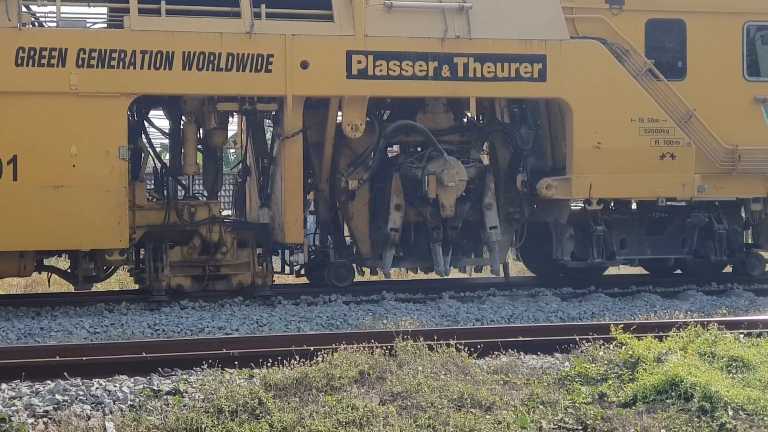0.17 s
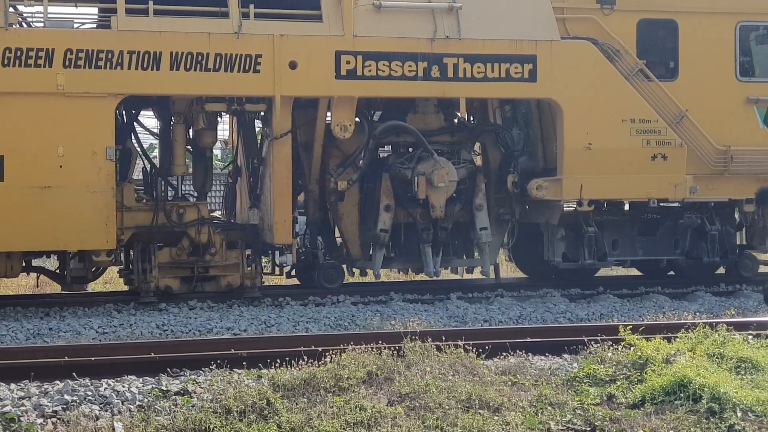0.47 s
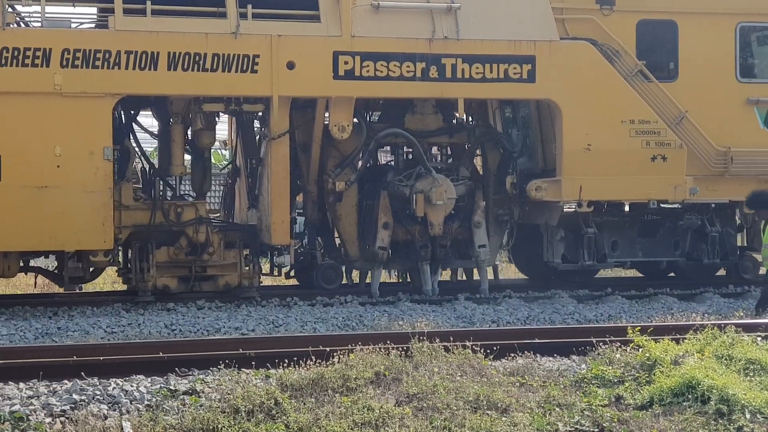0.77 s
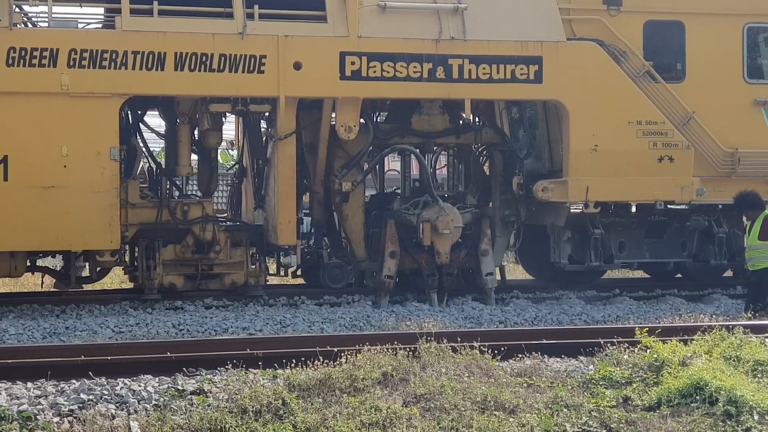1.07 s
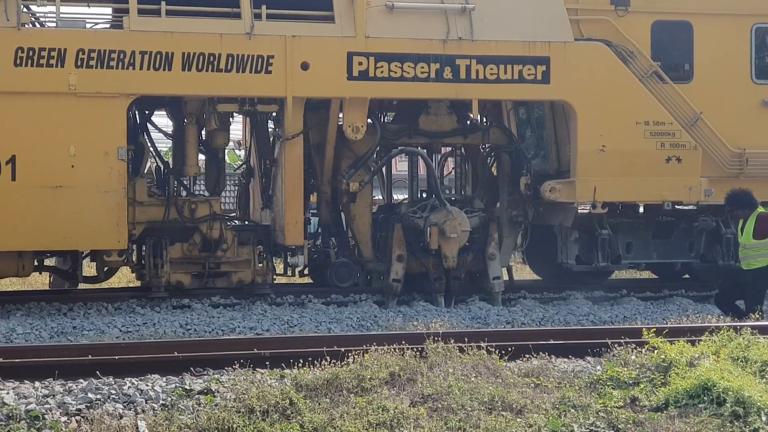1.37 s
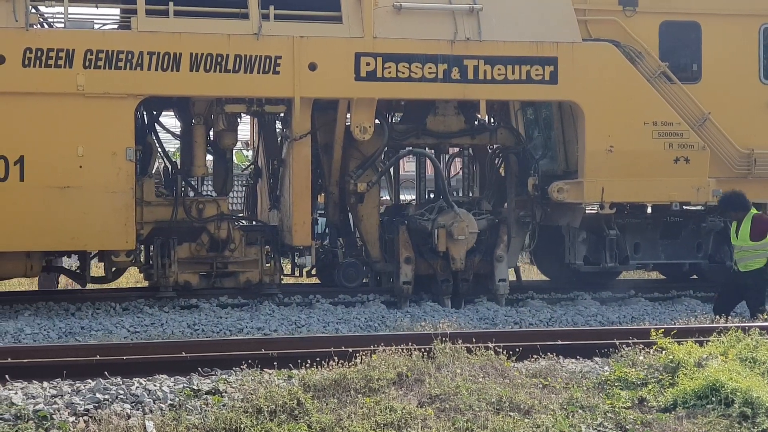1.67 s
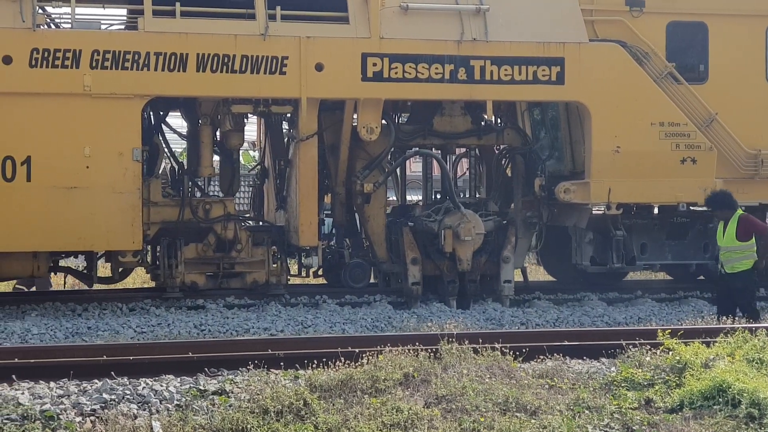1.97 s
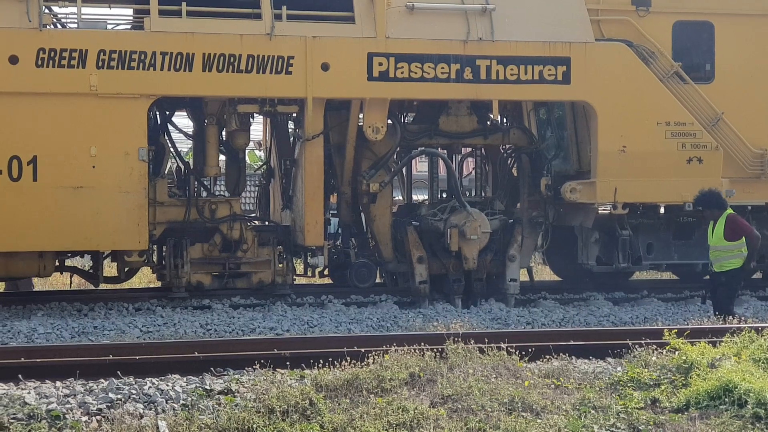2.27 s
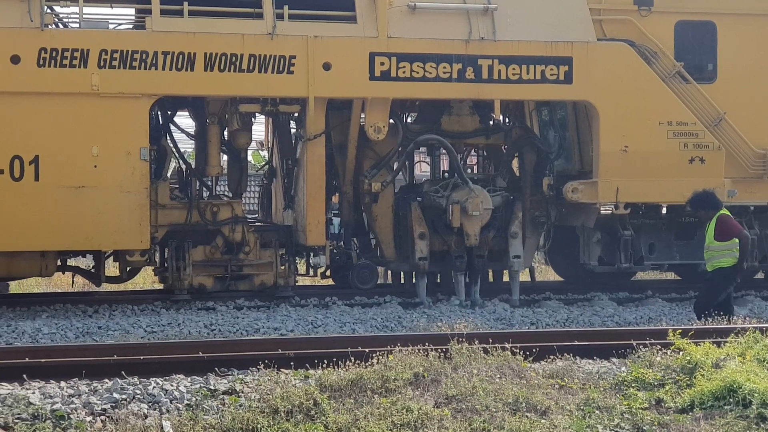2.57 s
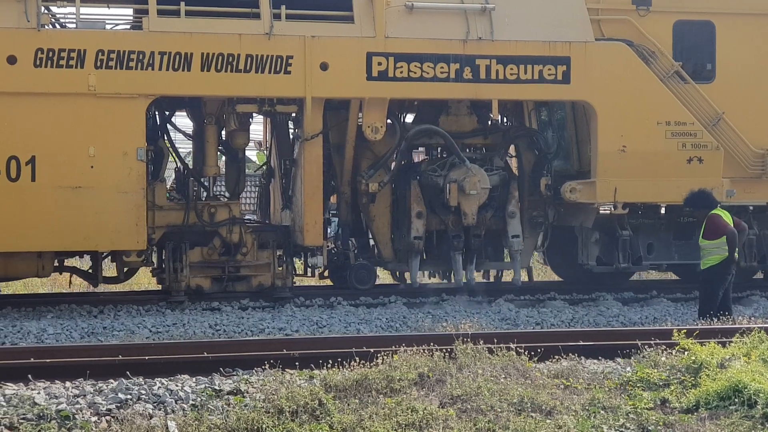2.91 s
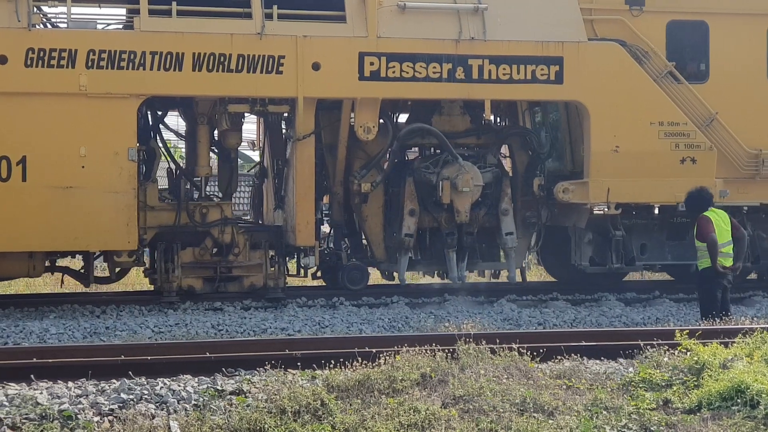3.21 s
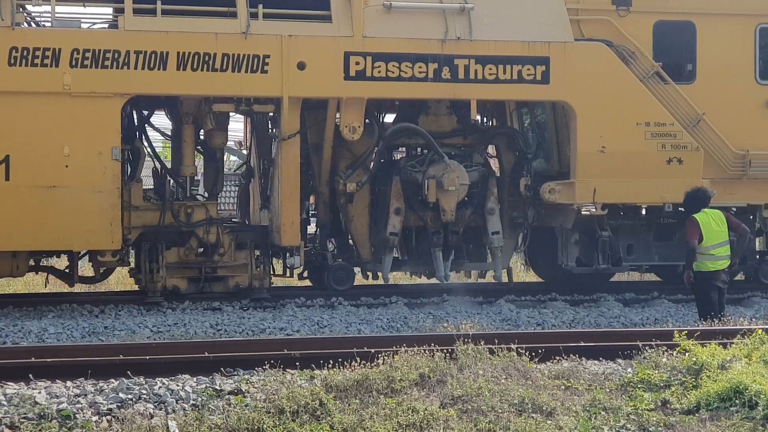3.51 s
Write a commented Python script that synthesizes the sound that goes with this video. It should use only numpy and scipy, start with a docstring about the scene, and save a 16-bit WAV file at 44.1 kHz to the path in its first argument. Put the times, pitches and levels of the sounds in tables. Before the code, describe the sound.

Track tamper crunches into ballast with metal squeaks and knocks over a steady diesel roar.

```python
"""Beside a railway line, a stereo microphone pair within earshot of a track tamping machine at work.
Its big diesel drones under a steady roar of fans, pumps and ringing panels. The tamping unit drops
with squeaks of sliding steel and clacks that ring its frame. The vibrating tines crunch into the
ballast and grind among the stones, and the crunch falls back as the unit lifts."""
import sys
import numpy as np
from scipy import signal
from scipy.fft import rfft, irfft
from scipy.io import wavfile
from scipy.ndimage import uniform_filter1d

SR = 44100
rng = np.random.default_rng(int(sys.argv[2]) if len(sys.argv) > 2 else 0)


def put_to_file(sound):
    """Save the sound as 16-bit audio at rate SR, in the file named by the first command-line argument."""
    columns = np.atleast_2d(sound).T  # one column per channel
    safe = np.clip(columns, -1, 1)
    whole_steps = np.round(safe * 32767)
    wavfile.write(sys.argv[1], SR, whole_steps.astype(np.int16))


N = 160965


def amp(db):
    return 10 ** (np.asarray(db) / 20)


def unit_rms(x):
    return x / np.sqrt(np.mean(x ** 2) + 1e-20)


def at_hz(points, hz):
    """Reads (frequency, value) points along a log frequency axis."""
    f, value = np.transpose(points)
    return np.interp(np.log(hz + 1), np.log(f + 1), value)


def curve(table, column):
    """One column of a timed table, joined by straight lines, at every sample."""
    table = np.asarray(table, float)
    return np.interp(np.arange(N) / SR, table[:, 0], table[:, column])


def colour(x, gain):
    """Filters by gain(hz) over the whole length."""
    return irfft(rfft(x) * gain(np.fft.rfftfreq(N, 1 / SR)), N)


def treble(hz, corner_hz):
    """Weight rising from 0 in the bass through a half at the corner towards 1."""
    return 1 / (1 + (corner_hz / (hz + 1)) ** 2)


def drift(rate_hz):
    """Random wander of rms 1, mostly slower than rate_hz."""
    return unit_rms(colour(rng.standard_normal(N), lambda hz: (hz > 0) / (1 + (hz / rate_hz) ** 4)))


def impacts(per_s, spread_db, decay_s):
    """Two noises chopped by one random train of small impacts whose power dies away."""
    energy = amp(2 * spread_db * np.minimum(rng.exponential(1, N), 5))
    strikes = rng.random(N) < per_s / SR
    power = signal.lfilter([1], [1, -np.exp(-1 / (decay_s * SR))], energy * strikes)
    return unit_rms(np.sqrt(power) * rng.standard_normal((2, N)))


def machine_roar():
    """The bed: fans and pumps roar through ringing panels, with a loose rattle in the treble."""
    # fan and pump noise (frequency [Hz], density [dB per Hz])
    spectrum = [(20, -75), (45, -56.5), (70, -53.5), (110, -57), (135, -58), (200, -62.5), (260, -61),
                (350, -59), (450, -60.5), (600, -64), (740, -59), (820, -59), (920, -59), (1050, -66.5),
                (1300, -64.5), (1700, -69), (2150, -70), (2700, -76.5), (3600, -77.5), (4200, -76.5),
                (6000, -83.5), (9000, -85), (16000, -89.5)]
    # resonances of panels and housings (frequency [Hz], width [Hz], boost [dB])
    panels = [(245, 10, 2), (347, 11.7, 6), (391, 24, 2.5), (750, 19, 2.5), (813, 36, 3), (832, 22, 4),
              (989, 50, 3.5), (1460, 69, 2.5), (2230, 80, 3.5), (4170, 77, 2)]
    # slight rise and fall of the roar (time [s], level [dB])
    levels = [(0, 0), (.3, 1), (.6, 1), (.9, 1.4), (1.3, -0.7), (1.8, 0.3), (2.3, 0.3), (2.7, -1),
              (3.1, -0.35), (3.65, -0.1)]
    patch_db, flutter_db = 1, 0.94
    rattle_share = lambda hz: 0.33 * treble(hz, corner_hz=1900)
    rush = colour(rng.standard_normal((2, N)), lambda hz: np.sqrt(1 - rattle_share(hz)))
    rattle = colour(impacts(per_s=300, spread_db=3, decay_s=0.006), lambda hz: np.sqrt(rattle_share(hz)))
    # the level flickers in small patches of frequency and time
    cells = signal.stft(rush + rattle, nperseg=2048, noverlap=1536)[2]
    patches = uniform_filter1d(rng.standard_normal(cells.shape[1:]), size=3, axis=0)
    patches = unit_rms(uniform_filter1d(patches, size=8, axis=1))
    noise = signal.istft(cells * amp(patch_db * patches), nperseg=2048, noverlap=1536)[1][:, :N]
    noise = noise * amp(flutter_db * drift(rate_hz=10.3) + curve(levels, 1))
    panel_db = lambda hz: sum(db / (1 + (2 * (hz - f) / width) ** 2) for f, width, db in panels)
    return colour(noise, lambda hz: amp(at_hz(spectrum, hz) + panel_db(hz)) * np.sqrt(SR / 2))


def diesel_drone():
    """Exhaust tone at the firing rate with a few weak orders, louder on the left microphone."""
    # running of the engine (time [s], firing rate [Hz], level of the firing tone [dB])
    running = [(0.08, 78.4, -15), (0.25, 77.9, -15.5), (0.4, 78.9, -14.5), (0.5, 78.7, -15.3),
               (0.6, 79.83, -14.5), (0.68, 78.6, -16), (0.76, 81.1, -17.1), (0.84, 80.9, -16),
               (0.92, 80.24, -17), (1.0, 79.63, -17), (1.1, 79.4, -15.5), (1.2, 78.77, -15),
               (1.35, 78.4, -15.5), (1.5, 78.65, -15.5), (1.7, 78, -15), (1.9, 77.8, -14.5),
               (2.15, 78.2, -15), (2.33, 78.23, -14), (2.45, 78.06, -15.5), (2.7, 77.94, -15),
               (3.0, 78, -15.5), (3.2, 77.7, -15.5), (3.4, 78.4, -15.5), (3.57, 77.91, -15.5)]
    # engine orders (multiple of the firing rate, level against the firing tone [dB], phase [rad])
    orders = [(1, 0, 0.5), (2, -21.5, 3), (4 / 3, -25.5, 0.5), (3 / 2, -31, .3)]
    start_rad, right_lag_rad, left_db = 0.14, .09, 3
    phase = start_rad + 2 * np.pi * np.cumsum(curve(running, 1)) / SR - np.array([[0], [right_lag_rad]])
    tone = sum(amp(db) * np.cos(order * phase + rad) for order, db, rad in orders)
    return np.sqrt(2) * amp(curve(running, 2)) * tone * amp([[left_db / 2], [-left_db / 2]])


def steel_squeaks():
    """Sliding steel whistles: each note swells, glides and rings out, a rough scrape just above it."""
    # squeaks and groans (start [s], hold [s], pitch [Hz], glide [Hz per s], level [dB], t60 [s])
    squeaks = [(.58, .03, 3075, -500, -40, .12), (.625, .035, 3068, -300, -42, .1),
               (.694, .04, 3085, 0, -41, .12), (.745, .025, 4140, 3300, -20, .07),
               (.755, .05, 758, 0, -35, .15), (.774, .014, 4195, 0, -29, .09),
               (.79, .065, 4168, 0, -39.5, .4), (.83, .022, 11470, -3000, -41.5, .13)]
    rise_s, waver_db, pitch_jitter, octave_db = .015, 1.2, .0012, -29
    scrape_db, scrape_above_hz = -16, 140
    right_db, right_lag_s = .6, 5.7e-5
    t, out = np.arange(N) / SR, np.zeros((2, N))
    waver, jitter = drift(rate_hz=60), drift(rate_hz=120)
    roughness = drift(rate_hz=90) + 1j * drift(rate_hz=90)
    scrape = amp(scrape_db) * roughness * np.exp(2j * np.pi * scrape_above_hz * t)
    for start, hold, hz, glide, db, t60 in squeaks:
        age = np.maximum(t - start, 0)
        pitch = hz * (1 + pitch_jitter * jitter) + glide * np.minimum(age, hold)
        phase = 2 * np.pi * (np.cumsum(pitch) / SR - np.array([[0], [hz * right_lag_s]]))
        growing_scrape = scrape * np.minimum(age / hold, 1) ** 2
        tone = ((1 + growing_scrape) * np.exp(1j * phase)).real + amp(octave_db) * np.sin(2 * phase)
        envelope = np.minimum(age / rise_s, 1) ** 2 * amp(db - 60 * np.maximum(age - hold, 0) / t60)
        out += envelope * tone
    return np.sqrt(2) * out * amp(waver_db * waver) * amp([[-right_db / 2], [right_db / 2]])


def frame_clacks():
    """The tamping unit knocks: each clack is a dying burst of noise and a short ring of the frame."""
    # knocks (time [s], level [dB], tilt [dB per octave], top [Hz], t60 of the burst [s],
    # ring level [dB], strongest ring near [Hz])
    knocks = [(.1805, -18.5, -3, 16000, .08, -16, 2200), (.4484, -20.5, -3.5, 15000, .05, -16, 2200),
              (.7213, -18, -3, 16000, .03, 5, 1300), (.8041, -16, -3.5, 7600, .075, 2, 2250),
              (1.322, -25, -3, 15000, .09, -16, 2200), (1.640, -25, -3, 15000, .06, -16, 2200),
              (1.778, -25, -2.5, 15000, .035, -16, 2200), (1.945, -27, -1, 16000, .05, -16, 2200),
              (2.064, -24, -3, 8000, .07, -16, 2200), (2.52, -30, -2.5, 15000, .05, -16, 2200),
              (2.575, -32, -2, 15000, .05, -16, 2200)]
    # modes of the steel frame (frequency [Hz], relative level [dB], t60 [s])
    modes = [(760, -8, .1), (1249, -2, .07), (1432, -6, .04), (2100, -6, .07), (2330, -5, .05),
             (2783, -7, .06), (3400, -9, .04)]
    rise_s, length_s, fall_db_per_octave = .002, .15, 7
    t, out = np.arange(8192) / SR, np.zeros((2, N))
    hz = np.fft.rfftfreq(len(t), 1 / SR)
    for start, db, tilt, top_hz, t60, ring_db, ring_hz in knocks:
        burst = rng.standard_normal((2, len(t))) * amp(-60 * t / t60)
        ring = np.zeros_like(burst)
        for mode_hz, mode_db, mode_t60 in modes:
            struck_db = mode_db - fall_db_per_octave * abs(np.log2(mode_hz / ring_hz))
            phase = 2 * np.pi * mode_hz * t + rng.uniform(0, 2 * np.pi, (2, 1))
            ring += amp(struck_db - 60 * t / mode_t60) * np.sin(phase)
        slope = amp(tilt * np.log2(np.maximum(hz, 500) / 3000))
        band = hz / (hz + 300) / (1 + (hz / top_hz) ** 8)
        clack = irfft(rfft(burst + amp(ring_db) * ring) * slope * band)
        at = round(start * SR)
        out[:, at:at + len(t)] += amp(db) * clack * np.minimum(t / rise_s, 1) * (t < length_s)
    return out


def ballast_crunch():
    """Stones crack and rub around the tines, crackling independently in each frequency band."""
    # ballast under the tines (frequency [Hz], density before the grinding levels [dB per Hz])
    spectrum = [(60, -70), (170, -59), (400, -64.5), (800, -72), (1300, -62), (1750, -67), (2200, -69),
                (2700, -69.5), (4200, -67), (5500, -70.5), (7200, -73), (10000, -79), (16000, -84)]
    # grinding of the tines (time [s], level [dB], extra level of the low part [dB])
    grind = [(.9, -25, -4), (.965, -17, -2), (.985, -0.5, -6), (1.06, 0.5, 1), (1.13, -3, -2.5),
             (1.2, -8, 9.5), (1.32, -6, 0), (1.45, -7.5, 3), (1.6, -7, 1.5), (1.8, -4.5, 4.5),
             (1.95, -5, 4), (2.05, -5, 8.5), (2.2, -4, 4), (2.38, -6, 7.5), (2.45, -7.5, -4),
             (2.58, -9.5, -11), (2.605, -21, -4), (2.8, -13, -5)]
    # borders between the bands of the crackle (frequency [Hz])
    borders = [1500, 3500, 6000, 9000]
    snap_db, low_part_hz = -6, 1803
    edges = [-1] + borders + [SR]
    stones = np.zeros((2, N))
    for lo, hi in zip(edges, edges[1:]):
        cracks = impacts(per_s=990, spread_db=2, decay_s=0.0024)
        stones += colour(cracks, lambda hz: (hz > lo) & (hz <= hi))
    snaps = impacts(per_s=25, spread_db=2.5, decay_s=0.0028)  # sparse larger stones
    stones += amp(snap_db) * colour(snaps, lambda hz: treble(hz, corner_hz=3200))
    crunch = colour(stones, lambda hz: amp(at_hz(spectrum, hz)) * np.sqrt(SR / 2))
    low = colour(crunch, lambda hz: 1 / (1 + (hz / low_part_hz) ** 4))
    return amp(curve(grind, 1)) * (crunch - low + low * amp(curve(grind, 2)))


def microphone_pair(pair):
    """Both microphones hear the first signal, only the right one the second; the bass is most alike."""
    # likeness of the two sides (frequency [Hz], coherence [0-1])
    likeness = [(20, .98), (400, .98), (600, .87), (850, .95), (1100, .65), (1450, .82), (1850, .6),
                (2200, .8), (2650, .45), (2900, .58), (3300, .3), (3800, .55), (4400, .3), (4900, .58),
                (5400, .35), (5900, .52), (6700, .2), (7300, .35), (8000, .1), (9000, .33), (16000, .15)]
    # balance of the pair (frequency [Hz], left minus right [dB])
    balance = [(60, 4), (92, 9), (140, 6), (210, 3), (330, 1.5), (500, 1.0), (770, 5.5), (1170, 1.5),
               (1790, -0.5), (2740, 6), (4190, -3), (6410, 1), (9810, 2), (15000, 1)]
    # phase between the sides (frequency [Hz], left lead [rad])
    lead = [(20, .05), (300, 0.09), (600, .6), (900, .05), (1100, 1.23), (1400, 0.34), (1750, 2.32),
            (2100, 6.06), (2300, 4.5), (2600, 9.2), (3000, 11.4), (3500, 10.2), (4100, 11.35), (4400, 12.4),
            (5300, 11.7), (6300, 15.1), (6800, 13.9), (8000, 10.4), (8500, 11.5), (10000, 11.2),
            (11000, 16), (12000, 17.7), (14000, 19.5), (15000, 22)]
    hz = np.fft.rfftfreq(N, 1 / SR)
    common, separate = rfft(pair)
    coherence, left_gain = at_hz(likeness, hz), amp(at_hz(balance, hz))
    right = coherence * common * np.exp(-1j * at_hz(lead, hz)) + np.sqrt(1 - coherence ** 2) * separate
    equal_power = np.sqrt(2 / (1 + left_gain ** 2))
    return irfft(np.array([common * left_gain, right]) * equal_power, N)


def scene():
    """The machine from the lineside; drone and squeaks carry their own place in the stereo image."""
    noises = machine_roar() + ballast_crunch() + frame_clacks()
    return diesel_drone() + microphone_pair(noises) + steel_squeaks()


def record(dry):
    """The microphones colour the treble, and a steep band limit cuts off the very top."""
    # microphone response (frequency [Hz], gain [dB])
    response = [(20, -0.64), (6000, 0.47), (7200, -1.5), (8300, -7), (10000, -2), (11800, 3.7), (13500, -3),
                (15500, -2)]
    top_hz = 15710
    heard = colour(dry, lambda hz: amp(at_hz(response, hz)))
    lowpass = signal.firwin(1023, top_hz, window=("kaiser", 9), fs=SR)
    return signal.oaconvolve(heard, lowpass[None], "same")


dry = scene()
out = record(dry)
put_to_file(out)
```